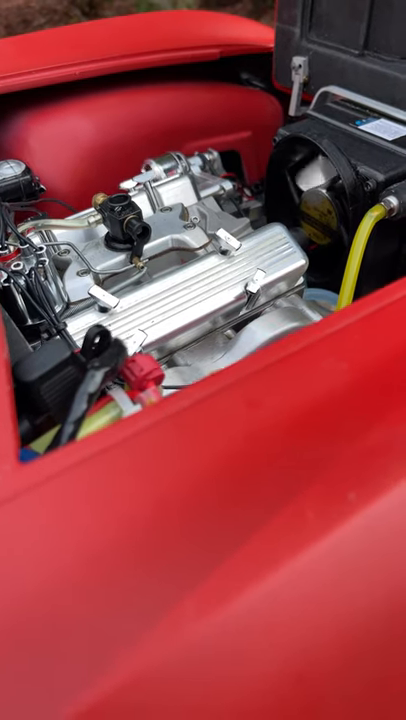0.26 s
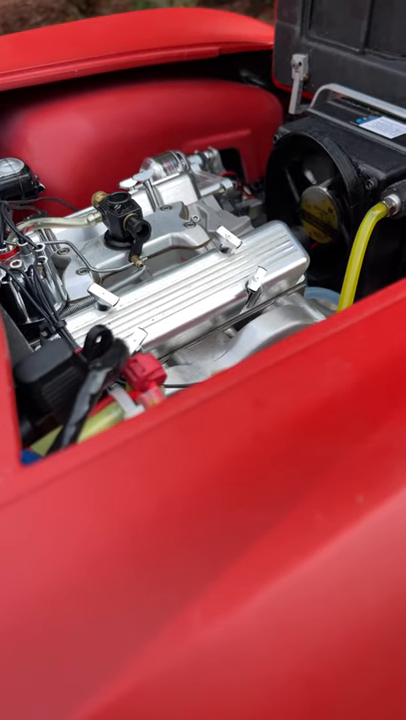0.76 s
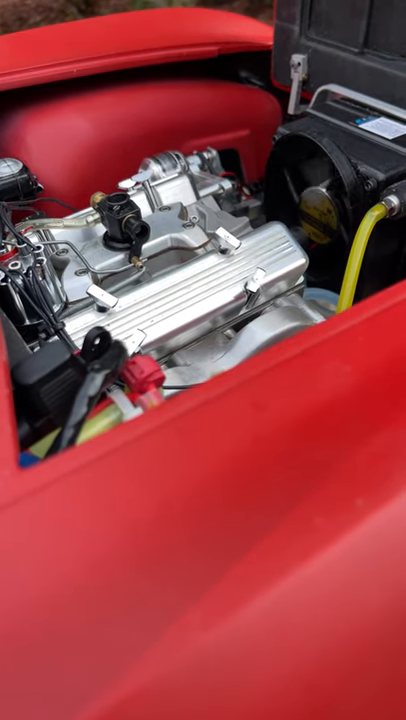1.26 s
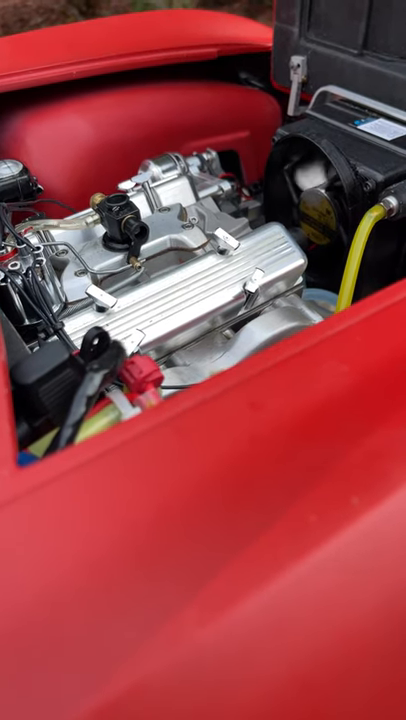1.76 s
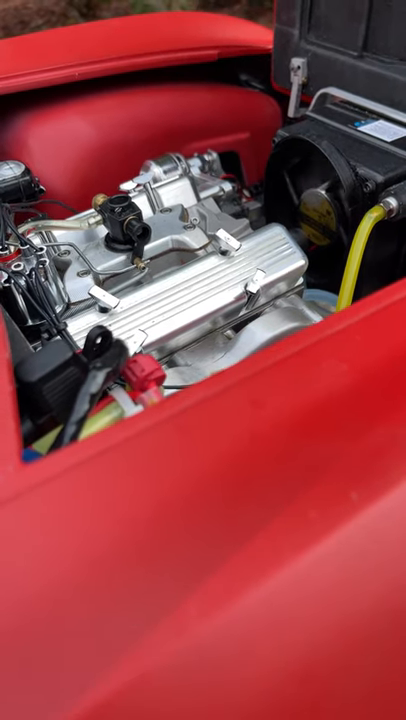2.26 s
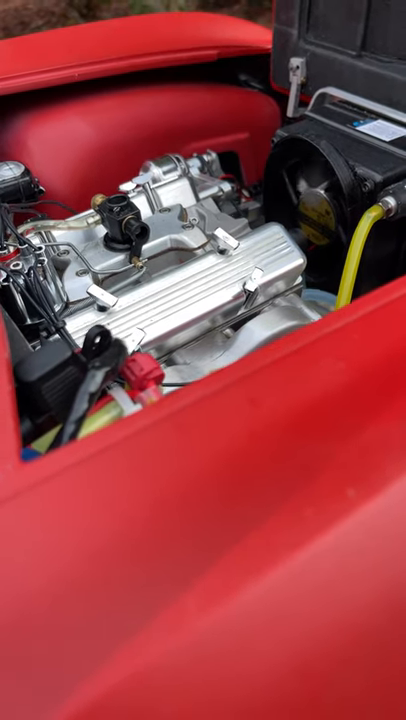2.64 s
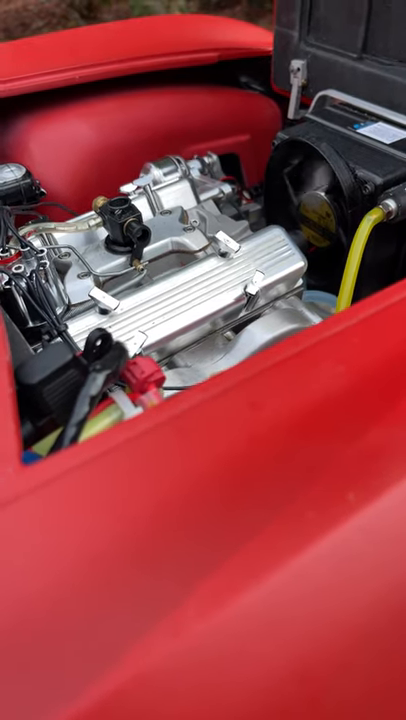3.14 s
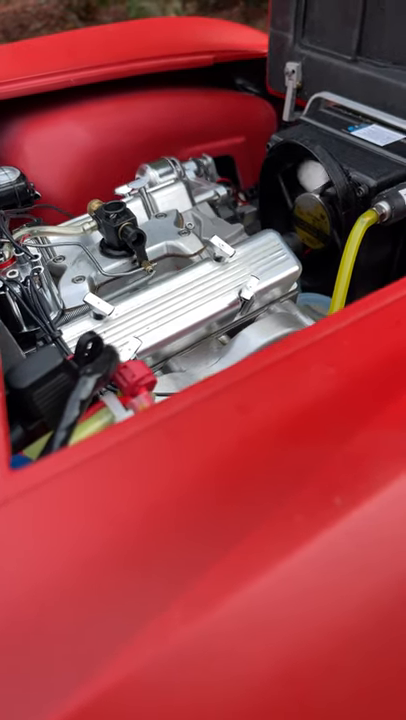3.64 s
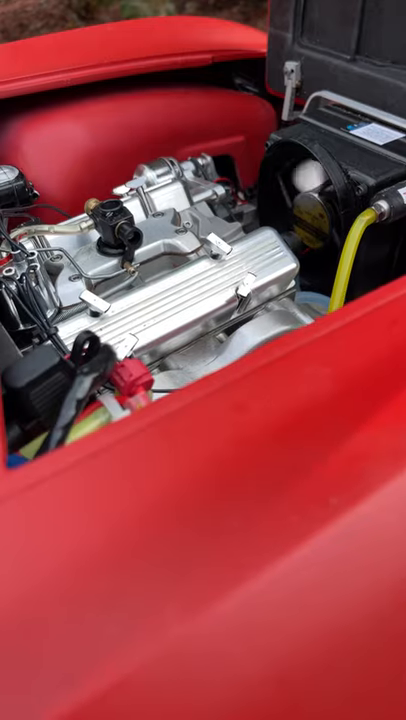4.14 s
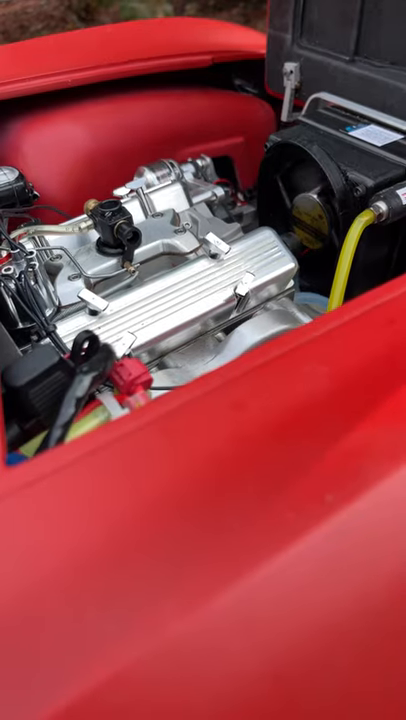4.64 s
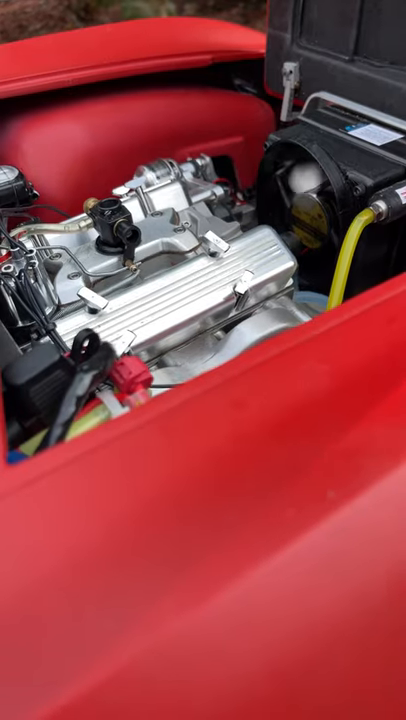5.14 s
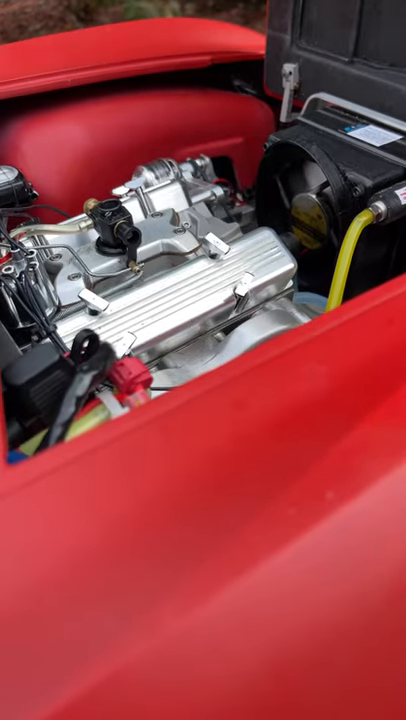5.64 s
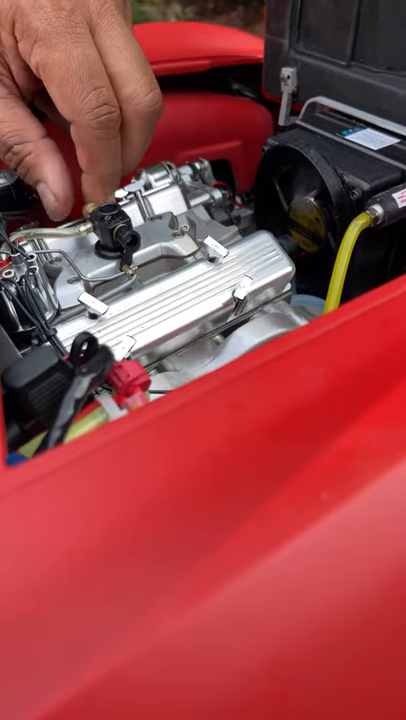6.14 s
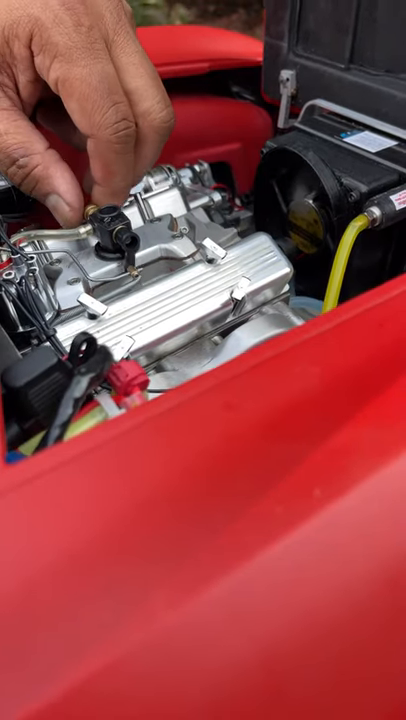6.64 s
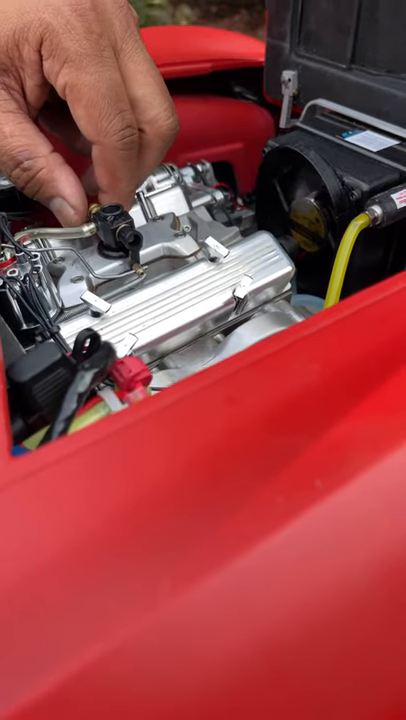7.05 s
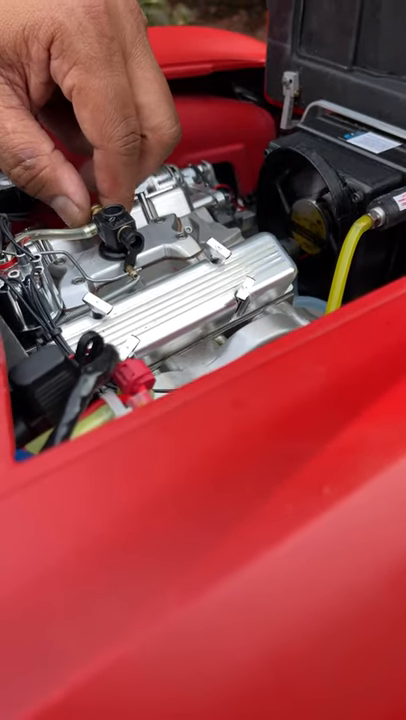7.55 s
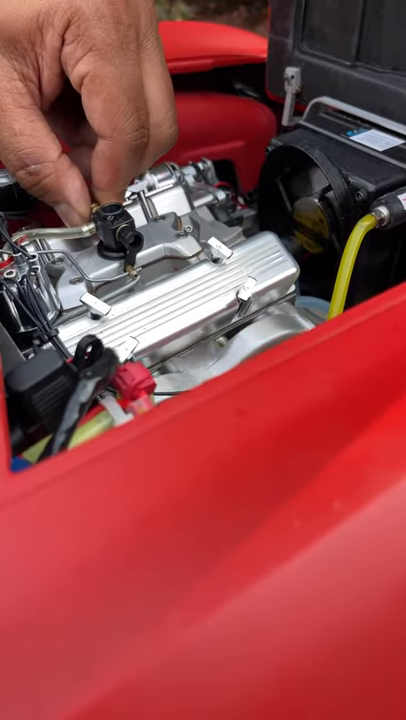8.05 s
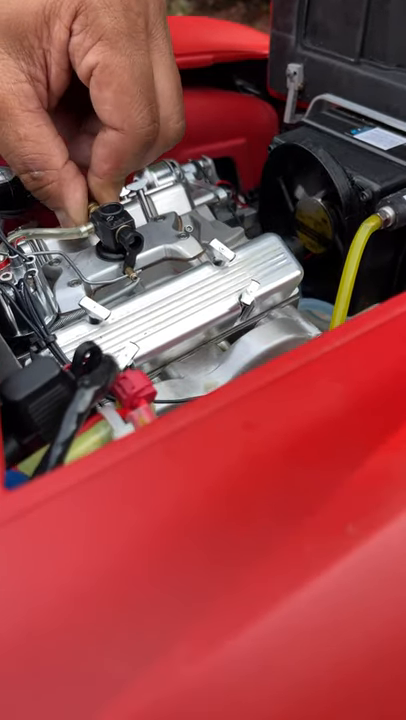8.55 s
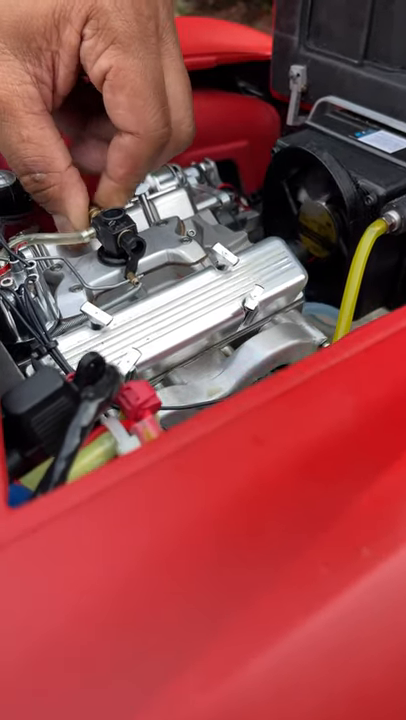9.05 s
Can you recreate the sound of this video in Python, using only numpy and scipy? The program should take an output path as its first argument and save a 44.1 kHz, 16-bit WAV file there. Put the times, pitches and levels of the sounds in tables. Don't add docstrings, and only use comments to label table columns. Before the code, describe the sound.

A phone at arm's length picks up a model car's small engine being cranked. A snap, then rapid valve rattle and rough starter whine run steadily for almost three seconds, growing thinner. Noise suppression then chops the din into irregular bursts, some with short hollow exhaust tones. Later come faint taps, tiny belt squeaks, one longer rattling burst and a few weak ringing ticks.

```python
import sys
import numpy as np
from scipy import signal
from scipy.fft import rfft, irfft
from scipy.io import wavfile
from scipy.ndimage import uniform_filter1d, minimum_filter1d

SR = 44100
rng = np.random.default_rng(int(sys.argv[2]) if len(sys.argv) > 2 else 0)


def volts_from_decibels(level):
    exponent = np.asarray(level, float) / 20
    return 10 ** exponent


def inscribe(sig):
    pcm = np.round(np.clip(np.atleast_2d(sig).T, -1, 1) * 32767)
    wavfile.write(sys.argv[1], SR, pcm.astype(np.int16))


N = 410130
TIME = np.arange(N) / SR
HZ = np.maximum(np.fft.rfftfreq(N, 1 / SR), 1)

CAM_PER_S, CAM_START_TURN = 16.822, -.47
BITE_S = .39
LEARNT_S, LEARNING_S = 2.75, .3

# (frequency [Hz], density [dB per Hz])
AIR = [(35, -58), (60, -16), (112, -12), (130, -13), (149, -2), (162, -11), (280, -8), (357, -21),
       (1440, -10.5), (5960, -26.5), (7600, -45), (9880, -74), (16700, -120)]
AIR_DB = -57.5

# (time [s], crack level [dB], centre [Hz], crack T60 [s], tail level [dB], tail T60 [s])
SOLENOID = (.3866, -3, 4500, .009, -13, .07)
# (frequency [Hz], width [Hz], level [dB])
WHINE = [
    (2100, 105, -14.5),
    (3078, 135, -22),
    (5486, 260, -22),
]

# (frequency [Hz], density [dB per Hz])
CLATTER = [(35, -54), (60, -18), (120, -9), (167, -12), (251, -3), (355, -3.5), (556, -3), (770, -6),
           (853, -20), (1000, -5), (2050, -3.5), (4460, -8.5), (5470, -9.5), (6570, -7.5), (7900, -17),
           (10300, -64), (17400, -120)]
# (frequency [Hz], width [Hz], level [dB])
BODY = [(72, 23, -3), (844, 250, 6.5), (1390, 100, -3.5), (1750, 130, 2), (2100, 130, -5), (3000, 490, 0.5),
        (3650, 58, 0), (4560, 100, -1.5), (5200, 1300, 3), (6470, 140, 0)]
# (frequency [Hz], level [dB], T60 [s])
RINGS = [(1323, -5.5, 0.052), (1650, -1.5, 0.031), (1800, -8.5, .025), (2063, -2.5, 0.049),
         (2130, -3, 0.013), (2300, 4.5, 0.036), (2670, 7.5, 0.012), (2990, 6, 0.019), (3220, 3.5, 0.027),
         (3560, 0.5, 0.049), (3760, 2.5, 0.06), (4050, 3.5, 0.018), (5300, 1.5, 0.031), (7040, -9.5, 0.028)]
RINGS_DB = -4.0
RING_T60_S, SEAT_SHARPNESS = .024, 1.5
# (first [s], last [s], rate [per s], depth [dB])
RASP = [(3.7573, 3.92, 56.0, 3.4), (4.4131, 4.7, 65.0, 2.7), (4.8966, 5.05, 60.75, 4.0),
        (5.138, 5.3, 66.5, 3.6), (5.6272, 5.78, 65.5, 2.8), (6.8825, 7.12, 66.5, 3.0)]
# (at first [dB], more once learnt [dB], more when ducked [dB])
THROB_ONCE = (-0.36, 1.06, 1.3)
THROB_TWICE = (0.9, -0, 1)

CYLINDERS_DB = [-2.5, -19, -6, -38, 2.5, -22.5, -4, -4]
# (frequency [Hz], width [Hz], level [dB])
PIPES = [(139.7, 18, -10), (262, 120, -8), (399, 65, 0.5), (571, 31, 0.5)]
# (order [1], level [dB])
CRANK_ORDERS = [(3, -18), (4, -2.5), (7, -2), (8, -13.5), (9, 0), (12, -2), (13, 0), (16.5, 1), (17, 4)]
ORDERS_DB = 1.5

# (time [s], level [dB])
DUCKING = [(.39, -35), (.42, -18.5), (.5, -18.5), (.56, -15), (2.7, -14), (2.73, -16.5), (3.1, -20.5),
           (3.2, -22), (3.44, -16.5), (3.5, -30.5), (3.59, -40), (3.63, -37), (4.35, -36), (4.8, -42.5),
           (5.4, -45), (6.7, -45.5), (7.44, -48.5), (9.3, -46)]
# (time [s], length [s], level [dB], sag over the length [dB], leading crack [dB])
OPENINGS = [(0.461, 0.018, -11, 1.2, -30), (2.62, 0.084, -16, 3, -28), (2.935, 0.15, -13.5, 2, -18),
            (3.484, 0.019, -14, 2, -40), (3.771, 0.11, -18.5, -1, -32.5), (4.045, 0.012, -30, 5.5, -45),
            (4.419, 0.25, -12, 4.5, -32.5), (4.887, 0.12, -14.5, 5, -38), (5.144, 0.12, -13.5, 4, -32.5),
            (5.623, 0.11, -11, 9, -26), (5.792, 0.0074, -19.5, 7, -36.5), (6.073, 0.019, -32, -0.7, -50),
            (6.792, 0.027, -36.5, 2, -42), (6.874, 0.4, -23.5, 4.5, -29.5), (7.299, 0.01, -34, 1.5, -49)]
OPEN_S, LEAD_S, SHUT_DB_PER_S = 0.013, 0.044, 428
SPLIT_HZ = [170, 330, 800, 4300]
# (level at first [dB], swell [dB/s], cut time [s], cut [dB], share of ducking escaped [1])
LOWS = [
    (-27, 5.5, 1.87, 32.5, 0.41),
    (-16, 4, 2.14, 14.5, 0.064),
    (-14.5, 3.5, 2.18, 5, 0.21),
]
LOWS_LATE_S = (0.084, 0.085, .02)
RECOVER_DB_PER_S = (3.5, 2.5, -0.55)
CUTTING_S = 0.48
LOWS_LAG_S, LAG_SHARE = 0.026, 0.28
# (first [s], last [s], level [dB])
BRIGHT = [
    (3.703, 3.956, -3.5),
    (5.1, 5.313, 2),
    (6.055, 6.108, 6),
    (6.752, 7.3, -2.5),
]
# (first [s], last [s], frequency [Hz], width [Hz], level [dB])
FAVOURED = [(.45, 1.3, 3760, 500, -16), (0.503, 1.497, 2085, 130, -18), (.5, 1.3, 5370, 200, -22),
            (2.355, 2.69, 604, 50, -20.5), (3.3, 3.526, 560, 121, -13), (5.143, 5.28, 4050, 400, -12),
            (6.82, 7.152, 3600, 160, -8.5), (6.837, 7.277, 5450, 400, -13)]

# (time [s], peak [dB], low
# centre [Hz], high centre [Hz], high against low [dB])
TAPS = [(3.6222, -19, 1030, 3410, -4), (5.9574, -27, 2360, 3130, 0), (5.9918, -27, 1770, 3630, 3),
        (6.1594, -25.5, 1770, 3010, -2), (6.2183, -26, 1980, 3340, -12), (8.6996, -27, 1630, 2770, 0),
        (9.0594, -35, 1780, 2720, 4), (9.2399, -29, 2340, 2840, -5),
        (0.408, -6, 1017, 4060, 6), (0.423, -2, 3100, 4050, 3.5), (0.45, -6, 2100, 3460, 7),
           (.468, -11, 2060, 3150, -1.5), (0.529, -2, 2090, 3380, -3), (8.234, -19, 1940, 3100, -18),
           (8.295, -17.5, 2100, 5860, -14), (8.412, -23, 1880, 3000, -5), (8.469, -18, 2010, 2860, 7),
           (8.528, -23.5, 2190, 3000, 2)]
# (time [s], peak [dB], centre [Hz])
KNOCKS = [(3.169, -4.5, 2100), (3.3317, -9.5, 1060), (3.413, -20, 2200), (3.5466, -15, 1010),
          (3.7512, -8, 2130), (3.77, -4, 1740), (3.7867, 3.5, 1750), (3.812, 2, 2200), (3.843, -5.5, 2280),
          (3.8777, -9, 2100), (4.036, -15.5, 1030), (4.1156, -19, 1660), (4.17, -19, 1070),
          (4.3982, -14, 2390), (4.4216, 1, 1800), (4.8492, -14, 1650), (4.8935, -8, 1870),
          (5.0264, -11.5, 2230), (5.1443, -3, 2270), (5.2675, -11, 2250), (5.307, -14, 2200),
          (5.5865, -13.5, 1850), (5.624, -4.5, 1800), (5.7943, -7, 2130), (6.0804, -16, 1940),
          (6.7723, -21, 1530), (6.836, -11, 2430), (7.1462, -13, 2300), (7.1914, -10.5, 2280),
          (7.2265, -9.5, 1680)]
# (first [s], last [s], peak [dB], loss per knock [dB], centre [Hz])
WHOLE_TURNS = [
    (2.753, 2.876, -6, -3, 2330),
    (6.879, 7.0606, -4.5, 0.4, 2170),
    (6.919, 7.106, -8, 0, 2370),
]
# (first [s], last [s], peak [dB], loss per knock [dB], centre [Hz])
HALF_TURNS = [(4.9235, 4.9887, .5, 2.8, 2400)]
UPPER_HZ, UPPER_SCATTER = 3080, 0.089

# (time [s], length [s], level [dB], frequency [Hz], glide [Hz])
HUM = [(3.021, 0.11, -27, 252.4, 43), (4.439, 0.27, -26, 271.7, -5), (4.899, .14, -30, 263, -25),
       (5.132, 0.17, -23, 286, -10), (5.605, 0.148, -20.5, 273, -16), (3.831, .04, -29.5, 251, -20),
       (6.871, 0.038, -23, 251, -50), (7.0, 0.034, -28, 296, 10), (7.063, 0.034, -22, 246, -72),
       (7.148, .11, -32, 323, 16)]
# (time [s], length [s], level [dB], frequency [Hz], glide [Hz])
SQUEAK = [
    (6.757, .03, -34, 1504, 30),
    (6.79, .02, -35, 1612, 20),
    (6.814, .036, -35, 1725, 15),
]
ARCH_HZ, ARCH_DB = 42, 13
HUM_ROUGH = .017

PHONE_RATE_HZ = 16000
# (frequency [Hz], level [dB])
MIRROR_SLOPE = [(7600, -49), (8000, -23.5), (8400, 3.5), (9600, -11.5), (10500, -26.0), (11050, -40), (11400, -51)]


def rms_one(x):
    return x / np.sqrt(np.mean(x ** 2) + 1e-20)


def in_time(rows):
    s, *columns = np.transpose(rows)
    return [np.interp(TIME, s, c) for c in columns]


def ramp(mid_s, length_s):
    return np.clip((TIME - mid_s) / length_s + .5, 0, 1)


def window(first_s, last_s, edge_s=0.018):
    corners = [first_s - edge_s, first_s + edge_s, last_s - edge_s, last_s + edge_s]
    return np.interp(TIME, corners, [0, 1, 1, 0])


def drift(rate):
    steps = rng.standard_normal(int(N / SR * 2 * rate) + 2)
    return rms_one(np.interp(TIME * 2 * rate, np.arange(len(steps)), steps))


def colour(x, points, peaks=()):
    hz, db = np.transpose(points)
    db = np.interp(np.log(HZ), np.log(hz), db, left=-80, right=-80)
    for at_hz, width, top_db in peaks:
        db = db + top_db / (1 + (2 * (HZ - at_hz) / width) ** 2)
    return irfft(rfft(x) * volts_from_decibels(db), N)


def resonance(x, hz, width):
    r = np.exp(-np.pi * width / SR)
    turn = 2 * np.pi * hz / SR
    return signal.lfilter([(1 - r * r) / 2, 0, (r * r - 1) / 2], [1, -2 * r * np.cos(turn), r * r], x)


def outdoors():
    ducked_db = -15.0 * (TIME > BITE_S - .004)
    air = rms_one(colour(rng.standard_normal(N), AIR))
    return volts_from_decibels(AIR_DB + ducked_db + 1.0 * drift(6.2)) * air


def solenoid():
    s, crack_db, hz, crack_t60, tail_db, tail_t60 = SOLENOID
    after = np.maximum(TIME - s, 0)
    shape = volts_from_decibels(crack_db - 60 * after / crack_t60) + volts_from_decibels(tail_db - 60 * after / tail_t60)
    return resonance(rng.standard_normal(N) * (after > 0) * shape, hz, 4500.0)


def starter_gears():
    mesh = rng.standard_normal(N)
    whine = 0
    for hz, width, db in WHINE:
        whine = whine + volts_from_decibels(db) * rms_one(resonance(resonance(mesh, hz, width), hz, width))
    return whine


def valve_train(turns, per_s=1000, seat_db=-1.5, seat_turn=.12):
    seats = np.diff((4 * (turns - seat_turn)).astype(int), prepend=0) > 0
    out = 0
    for hz, db, t60 in RINGS:
        stray = rng.random(N) < per_s / SR / 4
        clicks = (stray + volts_from_decibels(seat_db) * seats) * rng.standard_normal(N) + 1e-18
        r, w = volts_from_decibels(-60 / (min(t60, RING_T60_S) * SR)), 2 * np.pi * hz / SR
        out = out + volts_from_decibels(db) * signal.lfilter([0, np.sin(w)], [1, -2 * r * np.cos(w), r * r], clicks)
    return out


def rasp(scale=1.32):
    out = np.zeros(N)
    for first, last, per_s, depth_db in RASP:
        beat = np.exp(SEAT_SHARPNESS * (np.cos(2 * np.pi * per_s * (TIME - first)) - 1))
        active = (TIME > first - .5 / per_s) * (TIME < last)
        out += scale * depth_db * 2 * (beat - .5) * active
    return out


def clatter(turns, once_db, twice_db, per_s=4000, spread_db=3.0, patchy_db=1.0):
    sizes = volts_from_decibels(spread_db * np.minimum(rng.exponential(1, N), 4)) * rng.choice([-1, 1], N)
    contacts = rms_one(sizes * (rng.random(N) < per_s / SR))
    hiss = 0.43 * rng.standard_normal(N)
    metal = rms_one(colour(contacts + hiss, CLATTER, BODY))
    metal = metal + volts_from_decibels(RINGS_DB) * rms_one(valve_train(turns))
    throb_db = 0.79 * once_db * np.cos(2 * np.pi * turns) + 1.1 * twice_db * np.cos(4 * np.pi * turns)
    rasp_db = rasp() - 0.15 * np.cos(8 * np.pi * turns) + 1.0 * drift(70.0) + 0.3 * drift(15.0)
    spectrum = rfft(metal)
    band = np.clip(1.5 * np.log2(HZ / 60), 0, 11)
    out = 0
    for k in range(12):
        share = 1 / (1 + (k / 11.5) ** 8)
        gain = volts_from_decibels(share * throb_db + min(k / 6, 1) * rasp_db + patchy_db * drift(25.0))
        out = out + gain * irfft(spectrum * np.clip(1 - np.abs(band - k), 0, 1), N)
    return out


def exhaust(turns, rough_db=6.5, waver_db=3.0):
    steady = uniform_filter1d(turns, size=SR // 2, mode="nearest")
    count = (8 * steady).astype(int)
    fired = np.flatnonzero(np.diff(count))
    puffs = np.zeros(N)
    puffs[fired] = volts_from_decibels(np.take(CYLINDERS_DB, count[fired] % 8) + rough_db * rng.standard_normal(len(fired)))
    pipes = 0
    for k, (hz, width, db) in enumerate(PIPES):
        pipes = pipes + volts_from_decibels(db) * (-1) ** k * resonance(puffs, hz, width)
    crank = 2 * np.pi * 2 * steady
    orders = 0
    for order, db in CRANK_ORDERS:
        orders = orders + volts_from_decibels(db + waver_db * drift(4.0)) * np.sin(order * crank + drift(3.0))
    return rms_one(pipes) + volts_from_decibels(ORDERS_DB) * rms_one(orders)


def gate_level():
    power = volts_from_decibels(2 * in_time(DUCKING)[0]) + volts_from_decibels(2 * -48.0)
    for s, length, db, sag_db, lead_db in OPENINGS:
        span = slice(round((s - .1) * SR), round((s + length + .2) * SR))
        after = TIME[span] - s
        sag = sag_db * np.clip(after / length, 0, 1)
        wide_db = db - sag - SHUT_DB_PER_S * np.maximum(after - length, 0)
        power[span] += volts_from_decibels(2 * wide_db) * np.clip(after / OPEN_S + 1, 0, 1) ** 4
        power[span] += volts_from_decibels(2 * lead_db) * np.clip((after + LEAD_S) / OPEN_S + 1, 0, 1) ** 4 * (after < 0)
    return 10 * np.log10(power)


def lows(ducked_db):
    out = []
    for (db, swell, cut_s, cut_db, escape), late_s, recover in zip(LOWS, LOWS_LATE_S, RECOVER_DB_PER_S):
        since = np.clip(TIME - cut_s, None, 4.5)
        rise_db = -25.0 * (1 - ramp(BITE_S + late_s / 2, late_s))
        swell_db = swell * (np.minimum(TIME, cut_s) - BITE_S)
        change_db = recover * np.maximum(since, 0) - cut_db * ramp(cut_s, CUTTING_S)
        out.append(db + rise_db + swell_db + change_db + escape * ducked_db)
    return out


def suppressor(x, gate_db, treble_lag_s=0.013):
    gate = volts_from_decibels(gate_db)
    treble = minimum_filter1d(gate, size=max(int(treble_lag_s * SR), 1)) / gate
    bass_db, boom_db, drone_db = lows(np.maximum(-12.0 - gate_db, 0))
    bright_db = sum(db * window(first, last) for first, last, db in BRIGHT)
    humming = sum((TIME > row[0]) & (TIME < row[0] + row[1]) for row in HUM[:5])
    boom_db = boom_db - 2.5 * uniform_filter1d(1. * humming, size=SR // 50)
    lag = int(LOWS_LAG_S * SR / 2)
    late = minimum_filter1d(gate_db, size=2 * lag + 1, origin=lag) - gate_db
    boom_db, drone_db = boom_db + LAG_SHARE * late, drone_db + LAG_SHARE * late

    spectrum, out = rfft(x), 0
    above = [1] + [1 / (1 + (hz / HZ) ** 12) for hz in SPLIT_HZ] + [0]
    gains = [volts_from_decibels(bass_db), volts_from_decibels(boom_db), volts_from_decibels(drone_db), volts_from_decibels(-1.51), volts_from_decibels(-8.5 + bright_db) * treble]
    for k, gain in enumerate(gains):
        out = out + gain * rms_one(irfft(spectrum * (above[k] - above[k + 1]), N))
    rumble = rms_one(resonance(rng.standard_normal(N), 45.0, 90.0))
    out = out + volts_from_decibels(-43.5 + 7.0 * ramp(LEARNT_S, LEARNING_S)) * rumble
    for first, last, hz, width, db in FAVOURED:
        out = out + volts_from_decibels(db) * window(first, last) * rms_one(resonance(x, hz, width))
    return gate * out * (TIME > BITE_S)


def knocks(rows, rise_s, t60_s, wide_db, upper_db, width):
    out = np.zeros(N)
    t = np.arange(int(.1 * SR)) / SR
    shape = (1 - np.exp(-(t / rise_s) ** 2)) * volts_from_decibels(-60 * t / t60_s)
    body = rms_one(colour(rng.standard_normal(N), CLATTER, BODY))
    for s, db, low_hz, high_hz, *own_db in rows:
        at = round(s * SR)
        wide = body[at:at + len(t)]
        rattle = rms_one(resonance(wide, low_hz, width * low_hz)) + volts_from_decibels(wide_db) * wide
        rattle += volts_from_decibels(upper_db + sum(own_db)) * rms_one(resonance(wide, high_hz, width * high_hz))
        out[at:at + len(t)] += volts_from_decibels(db - 9) * rattle * shape[:len(wide)]
    return out


def weak_knocks():
    return knocks(TAPS, rise_s=0.0024, t60_s=0.06, wide_db=-7.5, upper_db=-3.0, width=0.057)


def loud_knocks():
    rows = list(KNOCKS)
    for runs, per_turn in ((WHOLE_TURNS, 1), (HALF_TURNS, 2)):
        for first, last, db, loss_db, hz in runs:
            times = np.linspace(first, last, round((last - first) * CAM_PER_S * per_turn) + 1)
            rows += [(s, db - loss_db * k, hz) for k, s in enumerate(times)]
    upper = UPPER_HZ * np.exp(UPPER_SCATTER * rng.standard_normal(len(rows)))
    rows = [(*row, hz) for row, hz in zip(rows, upper)]
    return knocks(rows, rise_s=0.0027, t60_s=0.062, wide_db=-2.0, upper_db=-5.0, width=0.14)


def hum():
    out, wander = np.zeros(N), 1 + HUM_ROUGH * drift(60.0)
    for s, length, db, hz, glide_hz in HUM + SQUEAK:
        span = slice(round(s * SR), round((s + length) * SR))
        t = TIME[span] - s
        along = 2 * t / length - 1
        edges = np.clip(np.minimum(t, length - t) / 0.011, 0, 1)
        pitch = hz + glide_hz * along / 2 - ARCH_HZ * along ** 2 * min(length / 0.087, 1)
        tone = np.sin(2 * np.pi * np.cumsum(pitch * wander[span]) / SR)
        out[span] += np.sqrt(2) * edges * volts_from_decibels(db - ARCH_DB * np.abs(along) ** 2.5) * tone
    return out * volts_from_decibels(2.0 * drift(40.0))


def scene():
    turns, gate_db = CAM_START_TURN + CAM_PER_S * TIME, gate_level()
    learnt = ramp(LEARNT_S, LEARNING_S)
    ducked = np.clip((-26.5 - uniform_filter1d(gate_db, size=SR // 10)) / 14.0, 0, 1)
    once_db, twice_db = (first + more * learnt + most * ducked for first, more, most in (THROB_ONCE, THROB_TWICE))
    din = rms_one(clatter(turns, once_db, twice_db)) + volts_from_decibels(-13.0) * rms_one(exhaust(turns))
    din = din + starter_gears()
    thin = signal.butter(2, 260.0, "high", fs=SR, output="sos")
    struck = signal.sosfilt(thin, loud_knocks() + weak_knocks())
    return (outdoors() + solenoid() + suppressor(din, gate_db) + struck + hum())[None]


def top_cut(x):
    return signal.sosfilt(signal.butter(12, 11420, fs=SR, output="sos"), x)


def record(dry):
    x = signal.sosfilt(signal.butter(1, 90.0, "high", fs=SR, output="sos"), dry)
    x = 0.74 * np.tanh(x / 0.84)
    x = signal.sosfilt(signal.cheby2(6, 30.0, PHONE_RATE_HZ / 2, fs=SR, output="sos"), x)
    mirror = x * np.cos(2 * np.pi * PHONE_RATE_HZ * TIME)
    top = signal.cheby2(24, 50, 11480, fs=SR, output="sos")
    return top_cut(signal.sosfilt(top, x + colour(mirror[0], MIRROR_SLOPE)))


dry = scene()
out = record(dry)
inscribe(out)
```